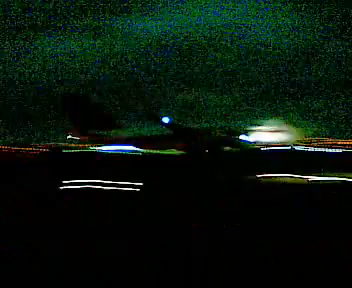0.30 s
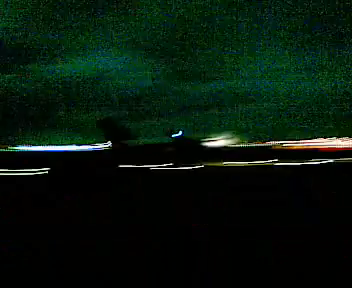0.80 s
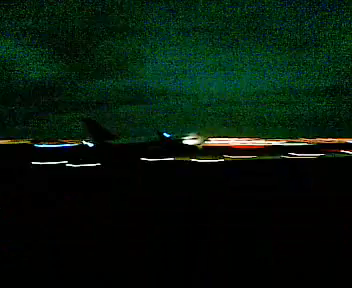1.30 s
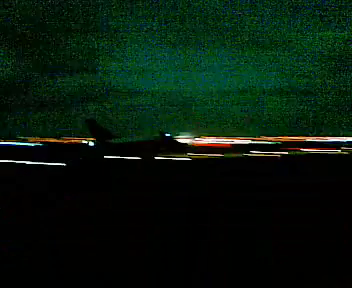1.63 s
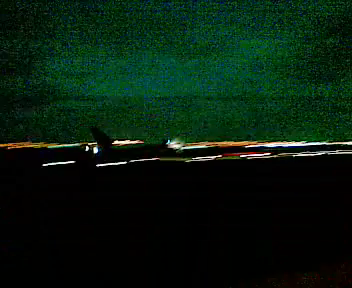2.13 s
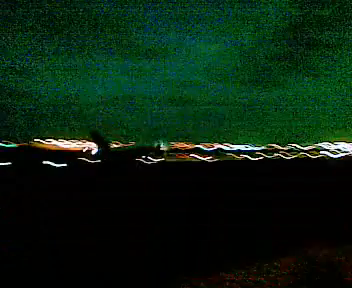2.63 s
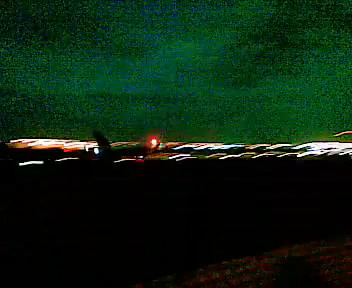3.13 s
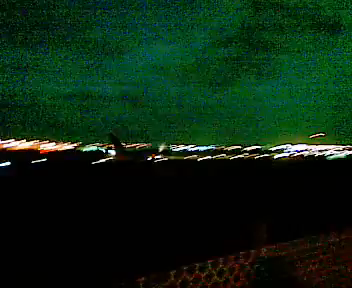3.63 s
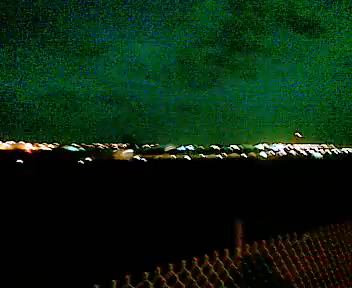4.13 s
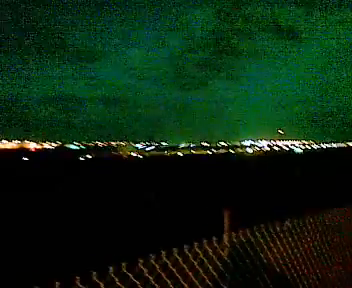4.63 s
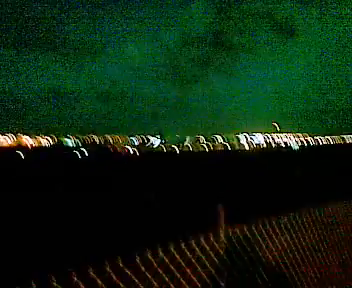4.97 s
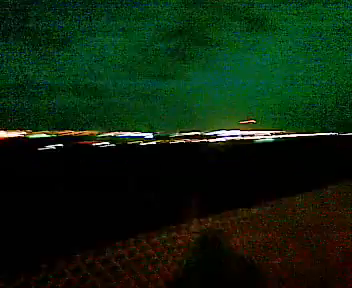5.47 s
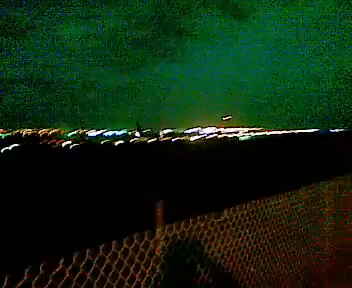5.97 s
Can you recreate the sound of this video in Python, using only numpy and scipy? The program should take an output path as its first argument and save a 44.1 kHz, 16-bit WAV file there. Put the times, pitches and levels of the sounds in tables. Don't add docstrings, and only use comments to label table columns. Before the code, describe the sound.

A large four-engine jet rolls along a runway at night, heard from an open fence. Broad roar, hiss and whirring fan tones swell and flicker in the moving air. The whine slides steadily lower as it passes, with a rough buzz underneath, then the treble dulls with distance. Wind flutters, thumps and pops on a small unprotected microphone, and finally reverse thrust rises as a distant rough whine and roar.

```python
import sys
import numpy as np
from scipy import signal
from scipy.io import wavfile

SR = 44100
rng = np.random.default_rng(int(sys.argv[2]) if len(sys.argv) > 2 else 0)


def bounce(signal):
    frames = np.transpose(np.atleast_2d(signal))
    limited = np.clip(frames, -1, 1)
    pcm = np.round(limited * 32767).astype(np.int16)
    wavfile.write(sys.argv[1], SR, pcm)


def natural_amplitude(level_db):
    exponent = np.asarray(level_db, float) / 20
    return 10 ** exponent


N = 276948

# time_s, pitch_hz, level_db
NEAR_FAN_TONE = [(0, 2870, -68), (.3, 2838, -56), (.84, 2758, -54), (1.26, 2695, -54), (1.68, 2626, -52),
                 (1.96, 2546, -49), (2.24, 2482, -47), (2.52, 2402, -50), (2.8, 2313, -53),
                 (3.08, 2212, -50), (3.36, 2107, -48), (3.64, 2018, -48), (3.92, 1928, -53),
                 (4.2, 1854, -57), (4.48, 1800, -60), (5.1, 1703, -68), (5.7, 1634, -56), (6.2, 1611, -56)]
# time_s, pitch_hz, level_db
FAR_FAN_TONE = [(.1, 2612, -59), (.5, 2546, -51), (1.1, 2490, -50), (1.5, 2420, -64), (1.78, 2368, -54),
                (1.89, 2342, -42), (2.1, 2285, -52), (2.5, 2168, -56), (2.9, 2062, -54)]
# time_s, pitch_hz, level_db
INNER_WHINE = [
    (.25, 1990, -65),
    (.5, 1975, -67.5),
    (1.1, 1950, -54.5),
    (1.35, 1940, -61),
    (1.7, 1916, -64),
]
# time_s, pitch_hz, level_db
REVERSE_WHINE = [(4.4, 2215, -60), (4.52, 2226, -56.5), (4.7, 2189, -81), (5.0, 2290, -64),
                 (5.3, 2363, -69), (5.6, 2304, -60), (5.8, 2393, -60), (6.05, 2300, -57), (6.28, 2430, -58)]
# time_s, gain_db, half_length_s
FOCUS = [(.8, 3, .15), (1.5, 2.5, .08), (1.95, 10, .05), (2.02, 17, .04), (2.14, -4, .03), (2.27, 5, .05),
         (2.34, -3, .025), (2.45, 5, .06), (2.97, 11, .06), (3.08, 14, .075), (3.35, 5, .04),
         (3.46, 9, .04), (3.58, 10, .05), (3.72, 4, .04), (3.8, -5, .04), (4.06, 8, .05), (4.15, 5, .025),
         (4.27, 4, .03), (4.38, 5, .04)]
# time_s, gain_db, half_length_s
HALF_ORDER = [
    (2.3, 11, 0.57),
    (2.75, 11.5, 0.075),
    (3.0, 20.8, 0.11),
]
# time_s, level_db
CARRY = [(0, -52.5), (.2, -50.5), (.9, -48.5), (1.9, -48.5), (2.2, -50), (2.85, -49.5), (3.35, -53),
         (3.9, -58.5), (5.25, -63.5), (5.95, -59), (6.28, -60.5)]
# time_s, gain_db, half_length_s, fan_lean_db
SWELLS = [(0.382, 6, 0.07, -0.5), (.66, 1, 0.13, -2), (0.87, 2.5, 0.11, -2.5), (1.167, 3, 0.067, -1),
          (1.455, 2, 0.16, -2), (1.76, 5, 0.084, 0.4), (1.978, 5.5, 0.12, -0.5), (2.43, 4.5, 0.06, -2),
          (2.63, 1, 0.08, 1.5), (3.045, 8, 0.1, 4), (3.197, 0.5, 0.11, 4.5), (3.384, -5.5, 0.046, 1),
          (3.59, 4, 0.17, 1.3), (4.084, 1.5, 0.13, 5.5), (4.58, 5, 0.17, 1), (4.9, 2, 0.056, 0.5)]
# level_db (at a carry of -50 dB), carry_share, swell_share, reverse_gain_db
LAYERS = [
    (-40, 0.64, 0.39, 3),
    (-42.5, 0.67, 0.66, 3),
    (-47.5, 1.16, 1.03, 0.8),
    (-51.5, 1.19, 0.75, -.5),
]
# frequency_hz, level_db (per Hz)
ROAR = [(40, -5), (80, 0), (160, -25), (300, -13), (480, -4), (680, 2.5), (1000, -9), (1400, -4),
        (1800, -12), (2600, -26.5)]
# frequency_hz, level_db (per Hz)
FAN = [(1300, -19.5), (1600, -10.5), (1850, 4.5), (2100, 1.5), (2380, 4), (2650, -2.5), (2950, -8),
       (3300, -30.5)]
# frequency_hz, level_db (per Hz)
HISS = [(2600, -0.5), (3100, -2), (3500, -3.5), (4300, 1.7), (4800, -4), (5300, -17.5)]
# frequency_hz, level_db (per Hz)
TOP = [(4500, -10), (5100, -2.5), (5700, -3.5), (6300, -1.5), (7000, -7), (7700, -2.5)]
# time_s, flutter_db, brightness_db (per octave)
WIND = [(0, -27.5, 1), (.65, -29, 0.8), (.75, -32.5, -2.5), (.95, -32.5, 1), (1.15, -33.5, 2.5),
        (1.45, -32.5, 0.3), (1.74, -38, 1), (1.8, -33, -0.2), (2.1, -41, -1.7), (2.7, -48, 1.6),
        (3.25, -40.5, 0), (3.5, -35, -1), (3.73, -45.5, 1.5), (4.55, -45.5, -1), (4.88, -34.5, -0.9),
        (5.16, -58, -0.5), (5.6, -53.5, 3.7), (6.28, -43, -0.5)]
# start_s, peak_db, length_s, brightness_db
BUFFETS = [(1.152, -18, 0.026, 4.4), (1.166, -17.5, 0.044, 2), (1.796, -15.5, 0.022, -2.5),
           (1.839, -20, 0.094, 3), (1.9, -15, 0.027, 1.5), (1.963, -13.5, 0.016, -8),
           (2.225, -14.5, 0.034, 0.7), (2.357, -15.5, 0.021, 3.5), (2.91, -24, 0.084, 2),
           (3.284, -18, 0.06, -3.2), (3.351, -19, 0.024, -11), (3.447, -12.5, 0.032, 1.5),
           (3.505, -16.5, .023, -2), (3.54, -14.5, 0.047, 2), (3.572, -14.5, 0.065, 3),
           (3.606, -16, 0.038, 1), (3.635, -17.5, 0.066, .5), (3.849, -16.5, 0.022, 0),
           (3.86, -19, 0.05, -2), (4.165, -22.5, 0.036, -2), (4.353, -20, 0.028, -1),
           (4.382, -19.5, 0.048, 0.5), (4.676, -16, .061, -4), (4.818, -23, 0.023, 3),
           (4.889, -15.5, 0.039, -1), (4.948, -8, 0.019, -9), (4.982, -11, 0.025, -1),
           (5.014, -15.5, 0.046, -5.5), (6.015, -32.5, 0.12, -7), (6.177, -13, 0.012, -8)]
# start_s, peak_db
MORE_BUFFETS = [(.029, -14), (.079, -16), (0.131, -27), (.189, -19), (.277, -18), (.374, -19), (.459, -27),
                (.519, -14.5), (.569, -19), (.638, -15), (0.675, -14.5), (.709, -13.5), (.814, -14), (.91, -18),
                (1.08, -16.5), (1.112, -14), (1.24, -14.5), (1.323, -16.5), (1.344, -16.5), (1.523, -18),
                (1.561, -24), (1.687, -30), (4.785, -22), (5.42, -37), (5.89, -33), (6.259, -19)]
# frequency_hz, level_db (per Hz)
GUST = [(30, -22.5), (55, -5), (85, 1.4), (160, 0), (300, -4.5), (550, -12.5), (900, -20), (1500, -48)]
# time_s, peak_db
POPS = [(.079, -20), (.664, -15), (1.085, -14.5), (1.12, -10), (1.181, -14), (1.192, -30), (1.324, -30),
        (1.801, -21), (1.907, -18), (2.232, -24), (2.358, -21), (3.575, -13), (3.593, -13), (3.614, -7.5),
        (3.852, -14), (4.159, -18.5), (4.393, -19), (4.682, -29), (4.704, -24), (4.833, -13), (4.902, -22),
        (4.952, -25), (4.981, -16), (4.997, -12), (6.171, -18.5), (6.264, -17.5)]
# frequency_hz, level_db (per Hz)
DEEP = [(20, -15), (32, -4), (50, 4), (70, -2.5), (95, -16.5)]
# time_s, gain_db, half_length_s
HEAVES = [(.42, 11.5, 0.042), (.65, 14, .05), (1.03, 4, .05), (1.24, 7, 0.052), (1.82, 11, .08),
          (3.27, 1.5, 0.09), (3.58, 4, .05), (4.1, 6.5, .05), (4.41, 11.5, .06), (4.72, 4.5, .06),
          (4.95, 9, 0.12), (5.44, 12, 0.031), (6.03, 15, 0.044)]


def engines():
    swells = np.array(SWELLS)
    carry_db = in_time(CARRY)[0] + 50
    swell_db = bumps(swells[:, :3])
    focus_db = bumps(FOCUS)
    lean_db = bumps(swells[:, [0, 3, 2]])
    reverse_start_s, reverse_rise_s = 5.25, 0.97
    reverse = np.clip((np.arange(N) / SR - reverse_start_s) / reverse_rise_s, 0, 1)
    roar_db, fan_db, hiss_db, top_db = [
        level_db + carry_share * carry_db + swell_share * swell_db + reverse_gain_db * reverse
        for level_db, carry_share, swell_share, reverse_gain_db in LAYERS]

    roar = natural_amplitude(roar_db + 0.27 * lean_db) * far_noise(ROAR, count=16, slow_db=-0.3, fast_db=1.0)
    fan = natural_amplitude(fan_db + lean_db) * far_noise(FAN, count=9, slow_db=1.2, fast_db=1.5)
    hiss = natural_amplitude(hiss_db) * far_noise(HISS, count=8, slow_db=0.5, fast_db=0.93)
    top_hiss = natural_amplitude(top_db) * far_noise(TOP, count=6, slow_db=-0.16, fast_db=1.0)
    noise = roar + fan + hiss + top_hiss

    half_db = -10.5 + bumps(HALF_ORDER) - focus_db
    near = fan_tone(NEAR_FAN_TONE, wobble=.0015, flutter_db=1.5, skirt_db=-7.5, skirt_hz=70, half_db=half_db)
    far = fan_tone(FAR_FAN_TONE, wobble=.003, flutter_db=3.5, skirt_db=-5, skirt_hz=50, half_db=-25)
    rough = dict(wobble=.004, flutter_db=4.0, skirt_db=9, skirt_hz=110, half_db=-30)
    tones = natural_amplitude(focus_db + 1.7) * near + far + fan_tone(REVERSE_WHINE, **rough) + fan_tone(INNER_WHINE, **rough)
    return noise + tones + turbine_glint()


def fan_tone(rows, wobble, flutter_db, skirt_db, skirt_hz, half_db):
    first, last = rows[0], rows[-1]
    fade_in, fade_out = (first[0] - .1, first[1], -90), (last[0] + .1, last[1], -90)
    hz, db = in_time([fade_in] + list(rows) + [fade_out])
    phase = 2 * np.pi * np.cumsum(hz * (1 + wobble * drift(33.1))) / SR
    line = natural_amplitude(flutter_db * drift(11)) * np.sin(phase)
    skirt = drift(skirt_hz) * np.sin(phase) + drift(skirt_hz) * np.cos(phase)
    half = drift(60) * np.sin(phase / 2) + drift(60) * np.cos(phase / 2)
    return natural_amplitude(db) * (np.sqrt(2) * line + natural_amplitude(skirt_db) * skirt + natural_amplitude(half_db) * half)


def turbine_glint():
    time_s, pitch_hz, level_db, half_length_s = 1.262, 4230, -43, .02
    t = np.arange(N) / SR - time_s
    return natural_amplitude(level_db) * np.exp(-(t / half_length_s) ** 2) * np.sin(2 * np.pi * pitch_hz * t)


def wind():
    t = np.arange(N) / SR
    steady_db, bright = in_time(WIND)
    power = natural_amplitude(2 * steady_db)
    flaps = [(start_s, peak_db, 0.034, -1) for start_s, peak_db in MORE_BUFFETS]
    for start_s, peak_db, length_s, bright_db in list(BUFFETS) + flaps:
        length_s = np.clip(length_s, .008, .12)
        near = slice(round(start_s * SR), round((start_s + 4 * length_s) * SR))
        age = (t[near] - start_s) / (length_s * 0.29)
        shape = (age * np.exp(1 - age)) ** 2
        power[near] += natural_amplitude(2 * (peak_db - 11.5)) * shape
        bright[near] += np.clip(bright_db, -6, 3) * np.sqrt(shape)
    lumps_db = 2.0 * np.clip(drift(75), -2, 1.6)
    push_db = 10 * np.log10(power) - steady_db + lumps_db
    reach = 0.18 * (steady_db + push_db + 29.0) + bright
    out = 0
    for hz, part in bands(GUST, count=13):
        share = np.clip(hz / 130, .25, 1)
        tilt_db = reach * np.log2(max(hz, 90) / 150)
        out = out + part * natural_amplitude(steady_db + share * push_db + tilt_db + 0.93 * drift(20))
    return out


def pops():
    out = np.zeros(N)
    before, after = 300, 500
    cycles = np.arange(-before, after) / SR * 320
    swing = np.sin(2 * np.pi * cycles) * np.exp(-(cycles / .45) ** 2)
    signs = rng.choice([-1, 1], len(POPS))
    for (time_s, peak_db), sign in zip(POPS, signs):
        at = round(time_s * SR)
        pop = sign * natural_amplitude(peak_db - 3.0) * swing
        out[at - before:at + after] += pop[:N - at + before]
    return out


def rumble():
    breeze_db = in_time(WIND)[0] + 40
    level_db = -48.5 + 0.21 * breeze_db + bumps(HEAVES)
    return natural_amplitude(level_db) * far_noise(DEEP, count=5, slow_db=1.0, fast_db=-3.5)


def far_noise(spectrum, count, slow_db, fast_db):
    return sum(part * natural_amplitude(slow_db * drift(4.9) + fast_db * drift(6.7)) for hz, part in bands(spectrum, count))


def bands(spectrum, count):
    hz, db = np.transpose(spectrum)
    edges = np.geomspace(hz[0], hz[-1], count + 1)
    white = rng.standard_normal((2, N))
    centres = np.sqrt(edges[1:] * edges[:-1])
    gains = natural_amplitude(np.interp(np.log(centres), np.log(hz), db))
    parts = []
    for k in range(count):
        sos = signal.butter(2, edges[k:k + 2], "band", fs=SR, output="sos")
        parts.append(gains[k] * signal.sosfilt(sos, white[k % 2]))
    parts = np.array(parts)
    return zip(centres, parts / np.std(parts.sum(0)))


def drift(rate_hz):
    hop = 40
    r = np.exp(-2 * np.pi * rate_hz * hop / SR)
    noise = rng.standard_normal(N // hop + 2002)
    slow = signal.lfilter([1], [1, -2 * r, r * r], noise)[2000:]
    return np.interp(np.arange(N) / hop, np.arange(len(slow)), rms_one(slow))


def bumps(rows):
    t = np.arange(0, N / SR + .01, .002)
    total_db = sum(gain_db * np.exp(-((t - time_s) / np.clip(half_length_s, .02, .5)) ** 2)
                   for time_s, gain_db, half_length_s in rows)
    return np.interp(np.arange(N) / SR, t, total_db)


def in_time(rows):
    time_s, *columns = np.transpose(rows)
    return [np.interp(np.arange(N) / SR, time_s, column) for column in columns]


def rms_one(x):
    return x / np.sqrt(np.mean(x ** 2) + 1e-20)


def scene():
    return (engines() + wind() + pops() + rumble())[None]


def patchy_luck(hz, s, tall, wide):
    patches = rng.standard_normal((len(hz) // tall + 1, len(s) // wide + 1))
    return np.kron(patches, np.ones((tall, wide)))[:len(hz), :len(s)]


def fray_treble(dry):
    hz, s, cells = signal.stft(dry, SR, nperseg=2800, noverlap=2100)
    hz = hz[:, None]
    luck = patchy_luck(hz, s, tall=2, wide=9)
    dropped = luck > 2.0 - (hz - 4500) / 2800 - .06 * s
    edge_luck = np.repeat(rng.standard_normal(len(s)), 8)[:len(s)]
    edge_hz = 7500 + 60 * (edge_luck + 1.5 * luck) - 50 * s
    return signal.istft(cells * (~dropped & (hz < edge_hz)), SR, nperseg=2800, noverlap=2100)[1]


def starve_treble(sound):
    from_s, to_s, above_hz = 4.81, 4.87, 6100
    hz, s, cells = signal.stft(sound, SR, nperseg=352)
    luck = patchy_luck(hz, s, tall=3, wide=3)
    dropped = (s > from_s) & (s < to_s) & (luck > (above_hz - hz[:, None]) / 1300)
    return signal.istft(cells * ~dropped, SR, nperseg=352)[1][:, :N]


def treble_mirror(sound):
    mirror = sound * np.cos(2 * np.pi * 16000 * np.arange(N) / SR)
    sos = signal.cheby2(8, 80, [7900, 9250], "band", fs=SR, output="sos")
    return signal.sosfilt(sos, mirror)


def band_limit(x):
    return signal.sosfilt(signal.butter(12, 9150, fs=SR, output="sos"), x)


def record(dry):
    narrow = starve_treble(fray_treble(dry))
    mix = narrow + natural_amplitude(-18) * treble_mirror(narrow)
    return band_limit(mix)


dry = scene()
out = record(dry)
bounce(out)
```